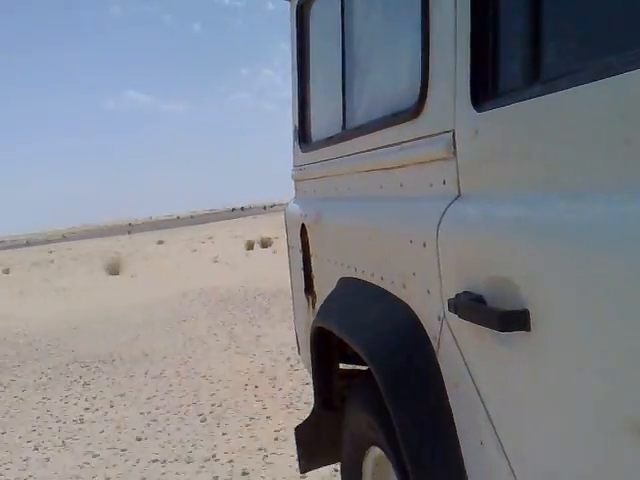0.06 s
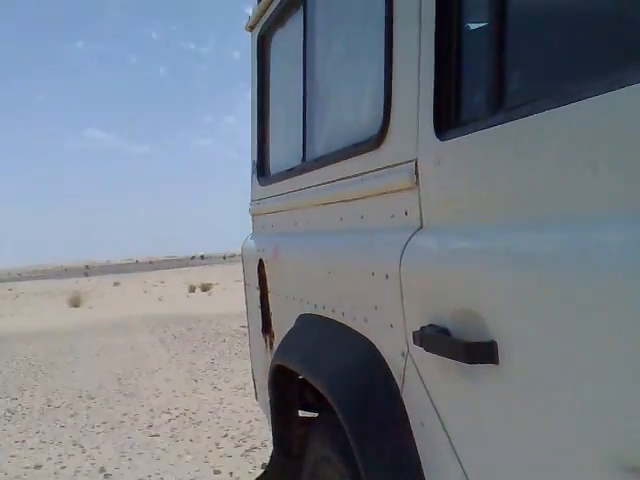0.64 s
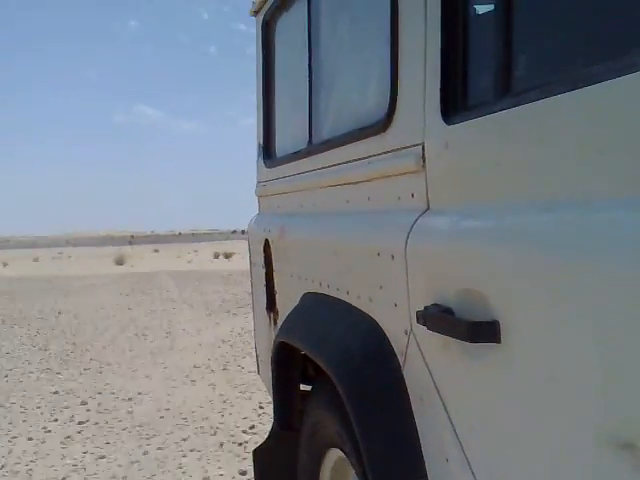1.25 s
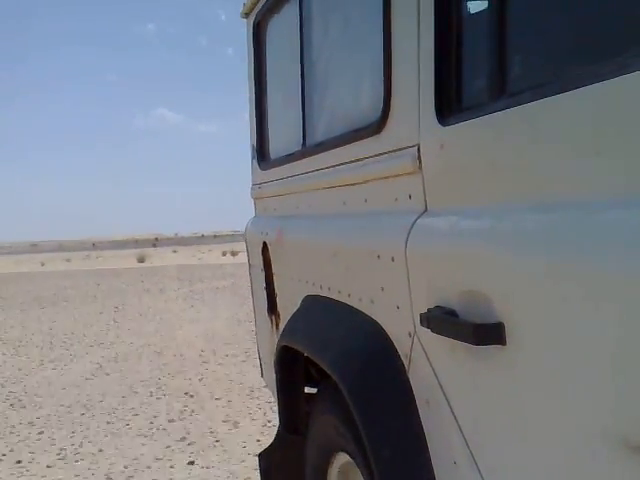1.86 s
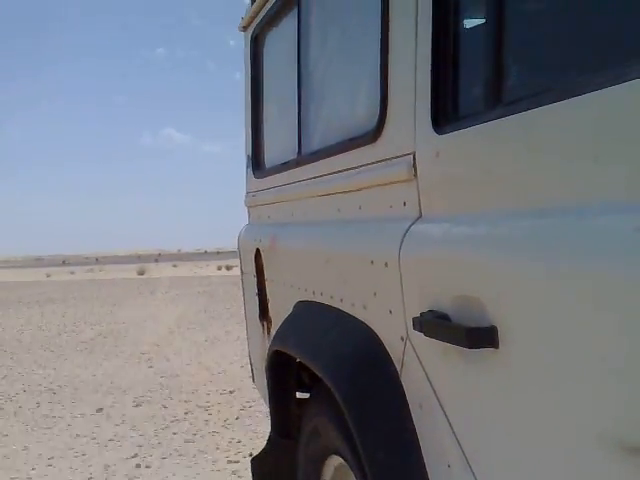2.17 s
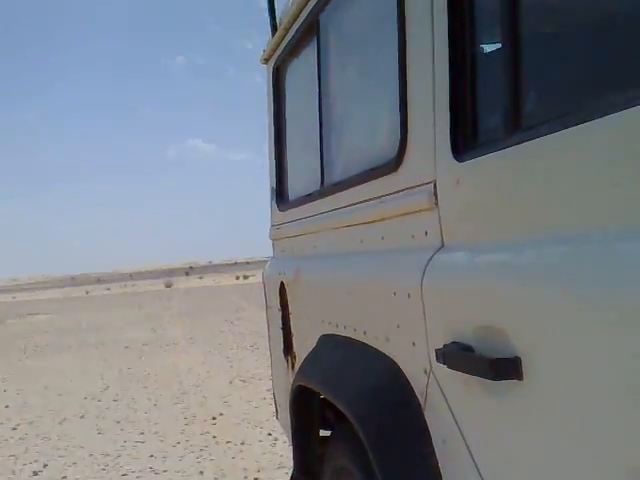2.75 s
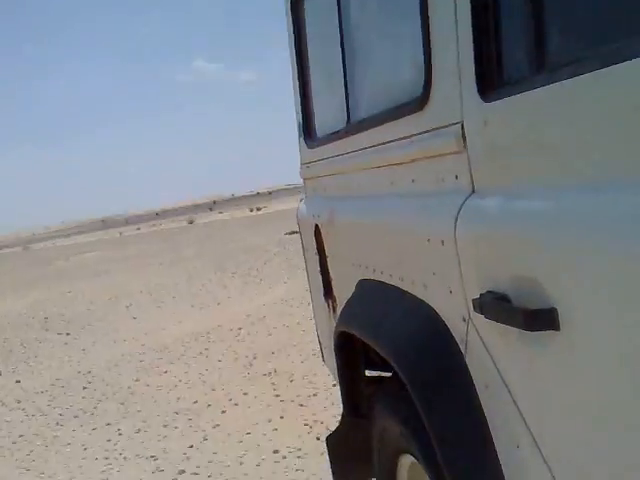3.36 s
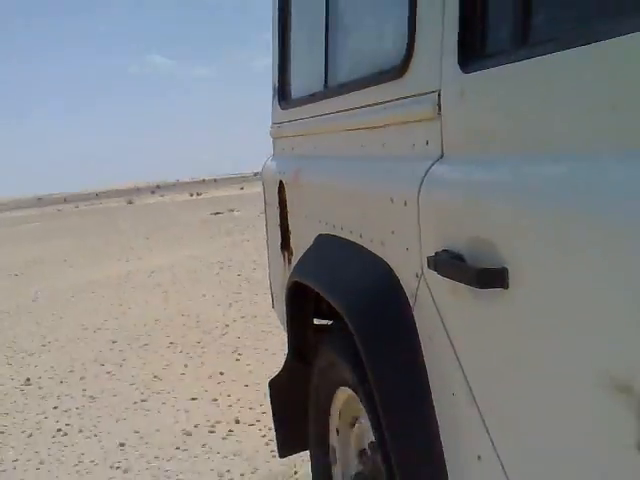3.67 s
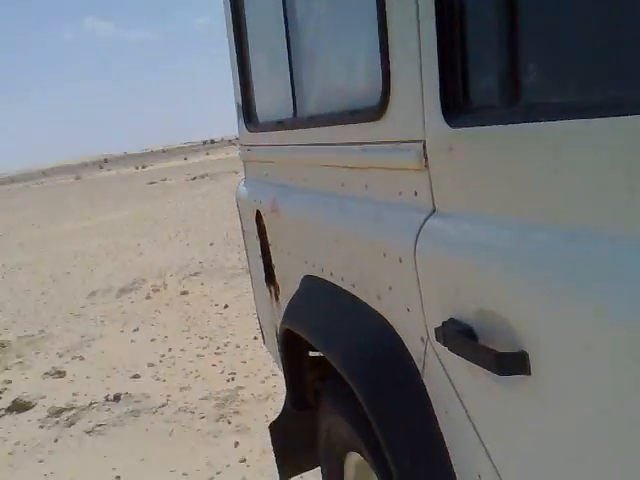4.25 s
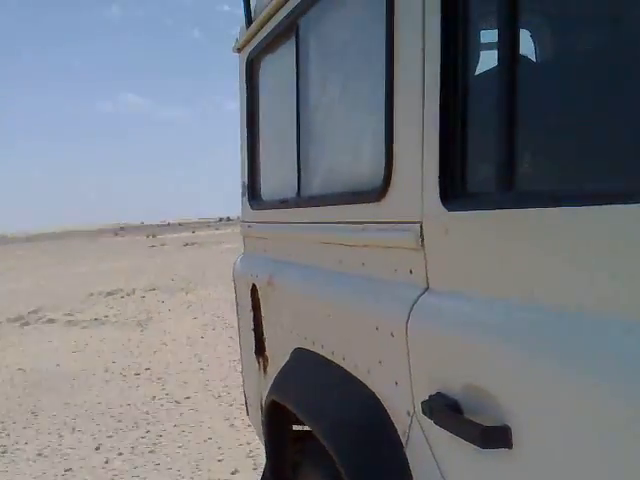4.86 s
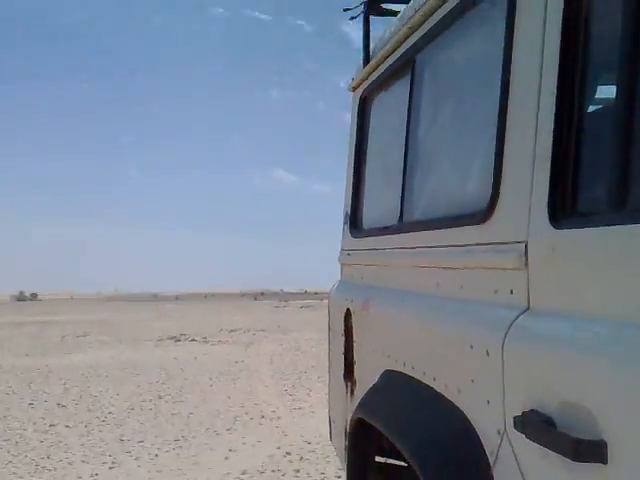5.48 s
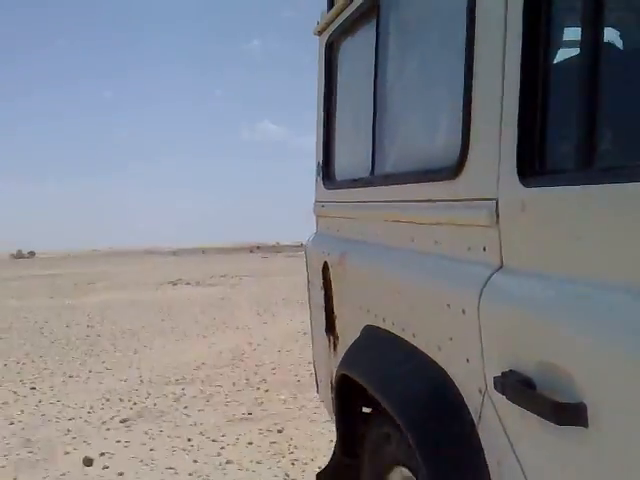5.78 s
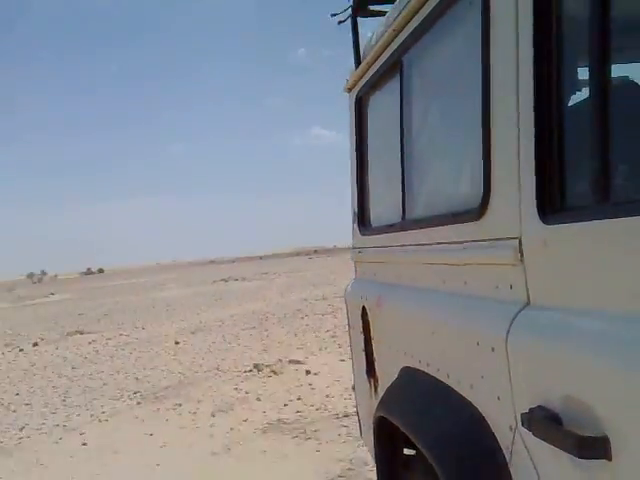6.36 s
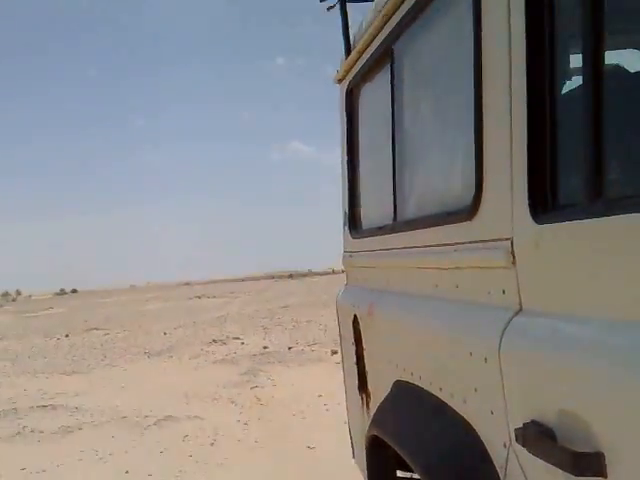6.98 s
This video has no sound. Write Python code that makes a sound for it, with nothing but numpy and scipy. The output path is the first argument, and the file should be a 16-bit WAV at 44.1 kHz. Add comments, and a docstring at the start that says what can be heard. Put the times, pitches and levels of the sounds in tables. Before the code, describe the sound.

Heavy wind buffets the microphone over tyres roaring on desert gravel, with grit spraying and an off-road vehicle's body rattling.

```python
"""Off-road drive over desert gravel

A small microphone is held out of a side window of the moving vehicle. Eddies shed by the body buffet
it and overload it; between them the tyres roar on the sand. Grit sprays into the wheel arch, stones
rattle on the body, a loose panel knocks, a fitting jingles, the springs chirp and a few sharp ticks
cut through."""
import sys
import numpy as np
from scipy import signal
from scipy.fft import rfft, irfft, next_fast_len
from scipy.io import wavfile
from scipy.ndimage import uniform_filter1d

SR = 44100
rng = np.random.default_rng(int(sys.argv[2]) if len(sys.argv) > 2 else 0)


def output_pcm(signal):
    """Save a mono or channel-first signal as 16-bit PCM at the path in sys.argv[1].

    Samples are clipped to [-1, 1] before scaling.
    """
    pcm = np.clip(np.atleast_2d(signal).T, -1, 1) * 32767
    wavfile.write(sys.argv[1], SR, np.round(pcm).astype(np.int16))


N = 313992
TIME = np.arange(N) / SR
SAND_FOLLOWS = 1.4   # dB of sand and stray grit per dB of tyre work

# spectrum of crushed gravel: frequency_hz, gain_db
CRUNCH_SPECTRUM = [(900, 1.5), (1600, 1.5), (2200, 0.5), (2700, 2.5), (3100, -5), (3500, -10.5),
                   (4100, -21.5), (5000, -24), (7000, -48.5)]
# slaps of air on the microphone port, dull thumps to sharp cracks: start_s, thump_db, crackle_db
AIR_SLAPS = [(0.034, -6.5, -54), (0.258, -6, -51), (0.46, -20, -60), (0.686, -9, -47), (0.952, -12, -60),
             (1.11, -6.5, -59), (1.184, -16.5, -62), (1.383, -12, -37), (1.666, -13, -50),
             (1.824, -6.5, -57), (2.059, -8, -42), (2.0623, -12, -26.5), (2.165, -9.5, -36),
             (2.21, -10, -30), (2.277, -12, -45), (2.442, -13.5, -43), (2.485, -16, -50), (2.542, -11, -45),
             (2.687, -11, -41), (2.843, -22, -53), (2.978, -12.5, -61), (3.02, -5, -41), (3.21, -14.5, -42),
             (3.809, -16.5, -56), (4.257, -23, -60), (4.707, -4, -53), (4.715, -11.5, -57),
             (5.085, -18, -58), (5.112, -19, -58), (5.132, -32, -66), (5.396, -10, -46),
             (5.432, -7.5, -28.5), (5.577, -12.5, -38), (5.718, -23, -53), (6.056, -16.5, -38.5),
             (6.14, -13, -48), (6.281, -17.5, -53), (6.314, -15.5, -48), (6.423, -12.5, -52),
             (6.46, -15, -58), (6.528, -11, -58), (6.62, -12.5, -59), (6.648, -13, -43), (6.736, -14, -57),
             (6.863, -23, -62), (6.922, -16.5, -41), (6.983, -13.5, -52), (6.995, -10.5, -34.5),
             (7.103, -16.5, -57)]


def from_db(db):
    """Decibels to gain."""
    return 10 ** (np.asarray(db) / 20)


def rms_one(x):
    """Scale to unit power."""
    return x / np.sqrt(np.mean(x ** 2) + 1e-20)


def colour(x, spectrum):
    """Shape x by rows of (frequency_hz, gain_db), falling 30 dB an octave past the ends; rms 1."""
    hz, db = np.transpose(spectrum)
    size = next_fast_len(N + 8192)
    log_hz = np.log2(np.maximum(np.fft.rfftfreq(size, 1 / SR), 1))
    octaves_outside = np.abs(log_hz - np.clip(log_hz, np.log2(hz[0]), np.log2(hz[-1])))
    gain = from_db(np.interp(log_hz, np.log2(hz), db) - 30 * octaves_outside)
    return rms_one(irfft(rfft(x, size) * gain, size)[:N])


def noise(spectrum):
    """Coloured noise, rms 1."""
    return colour(rng.standard_normal(N), spectrum)


def drift(rate_hz):
    """Smooth random wander, mostly slower than rate_hz; rms 1."""
    hop = 40
    pole = np.exp(-2 * np.pi * hop * rate_hz / SR)
    slow = signal.lfilter([1], [1, -2 * pole, pole * pole], rng.standard_normal(N // hop + 2002))[2000:]
    return np.interp(np.arange(N) / hop, np.arange(len(slow)), rms_one(slow))


def evened(x, span_s):
    """Hold the power of a noise steady over spans of this length."""
    width = max(int(span_s * SR), 2)
    return x / np.sqrt(uniform_filter1d(uniform_filter1d(x ** 2, width), width) + 1e-3)


def swells(rows, rise=0.48, steep=2):
    """Gain of bell curves (peak_s, length_s, level_db) added in power; rise is the share before the top."""
    power = np.zeros(N)
    for peak_s, length, db in rows:
        near = slice(*np.searchsorted(TIME, [peak_s - 4 * length, peak_s + 4 * length]))
        age = (TIME[near] - peak_s) / length
        flank = np.where(age < 0, rise, 1 - rise)
        power[near] += from_db(db) ** 2 * np.exp(-np.abs(age / flank) ** steep)
    return np.sqrt(power)


def grains(per_s, spread_db):
    """Random impacts of uneven size."""
    sizes = from_db(spread_db * np.minimum(rng.exponential(1, N), 5))
    return (rng.random(N) < per_s / SR) * sizes * rng.choice([-1, 1], N)


def filtered(x, order, hz, kind):
    """Pass x through a maximally flat filter."""
    return signal.sosfilt(signal.butter(order, hz, kind, fs=SR, output="sos"), x + 1e-18)


def ring(x, modes):
    """Sound x through resonances (pitch_hz, level_db, t60_s)."""
    ringing = 0
    for hz, db, t60 in modes:
        r = from_db(-60 / (t60 * SR))
        mode = signal.lfilter([1, 0, -1], [1, -2 * r * np.cos(2 * np.pi * hz / SR), r * r], x + 1e-18)
        ringing = ringing + from_db(db) * np.sqrt((1 - r * r) / 2) * mode
    return ringing


def ground_db():
    """How much harder than usual the tyres work the ground."""
    # tyre work along the track: time_s, level_db
    track = [(0.0, -31), (0.27, -33.5), (1.15, -34.5), (2.05, -38), (2.42, -37), (3.23, -39.5), (4.29, -37),
             (4.84, -36), (5.22, -37.5), (5.56, -42), (6.1, -41.5), (6.24, -37.5), (6.82, -41),
             (7.0, -42.5)]
    # looser gravel that the tyres dig into: peak_s, length_s, rise_db
    patches = [(0.917, 0.046, 2), (3.592, 0.046, 5.5), (4.05, 0.028, 2.5), (5.327, 0.14, 5.5),
               (5.583, 0.037, 4.5), (5.73, 0.08, 9), (5.87, .05, 5), (6.98, 0.069, 6)]
    usual_db = -36.5
    digging_db = sum(rise * swells([(s, length, 0)]) for s, length, rise in patches)
    return np.interp(TIME, *np.transpose(track)) - usual_db + digging_db


def tyres():
    """Treads roar, crush gravel and throw up fine sand; all three follow the ground and its bumps."""
    # tread roar: frequency_hz, gain_db
    roar_spectrum = [(30, -8), (70, 5.5), (110, 7.5), (170, 15.5), (240, 0.5), (330, 7), (500, 3.5),
                     (780, 5.5), (1050, -1.5), (1500, -4), (2100, -13), (3000, -26), (4000, -55)]
    # flying sand: frequency_hz, gain_db
    sand_spectrum = [(3000, -5), (4200, -5.5), (4900, -2), (5600, -7), (6600, -8.5), (8500, -17.5),
                     (11000, -21), (13500, -17), (16000, -34.5)]
    work_db = ground_db() + 1.2 * drift(rate_hz=28)
    roar = from_db(-28.5 + work_db) * noise(roar_spectrum)
    crunch = from_db(-34 + 0.95 * work_db) * colour(grains(per_s=9000, spread_db=-0.5), CRUNCH_SPECTRUM)
    sand = from_db(-60 + SAND_FOLLOWS * work_db) * colour(grains(per_s=3100, spread_db=1), sand_spectrum)
    return roar + crunch + sand


def gravel():
    """Showers of grit and pebbles rattle in the wheel arch, over a light patter that never stops."""
    # showers thrown into the arch: peak_s, length_s, level_db
    sprays = [(.025, 0.029, -40.5), (.121, .008, -51), (.42, 0.043, -61), (.73, .012, -55),
              (.86, 0.013, -56), (1.385, 0.03, -54), (1.53, .015, -64), (1.584, 0.0042, -47),
              (1.858, 0.0045, -49), (2.836, 0.0092, -51.5), (3.572, 0.014, -54), (3.61, 0.038, -52),
              (3.667, 0.013, -45), (3.7, .05, -55), (3.989, 0.014, -50), (4.07, 0.048, -50.5),
              (4.206, 0.0081, -50), (4.256, 0.022, -55.5), (4.41, 0.027, -56), (4.448, 0.033, -52),
              (4.766, .01, -59), (4.89, .014, -61), (4.935, .015, -57), (4.99, .04, -63),
              (5.09, 0.078, -55.5), (5.242, .012, -57), (5.33, 0.034, -56), (5.721, 0.0058, -44),
              (5.78, 0.023, -48.5), (5.83, 0.057, -53.5)]
    # fine grit striking the arch: frequency_hz, gain_db
    grit_spectrum = [(2000, -3.5), (3800, 7.5), (4700, 0), (5400, -1.5), (6500, -3), (8500, -6),
                     (11000, -8), (13500, -9), (15500, -16.5)]
    patter = from_db(-71 + SAND_FOLLOWS * ground_db() + 6.5 * np.clip(drift(rate_hz=32), -2, 2))
    showers = np.hypot(from_db(3.5) * swells(sprays, rise=0.58), patter)
    pebbles = from_db(10.5) * colour(grains(per_s=1400, spread_db=7.5), CRUNCH_SPECTRUM)
    grit = colour(grains(per_s=9800, spread_db=4), grit_spectrum)
    return showers * (grit + pebbles)


def stones():
    """Single stones skitter on a body panel, each in a few quick contacts."""
    # stone strikes: peak_s, level_db
    strikes = [(.265, -49), (.394, -54), (.581, -48), (.73, -45), (.86, -46), (1.009, -54), (1.525, -46.5),
               (1.707, -49), (1.858, -43.5), (2.57, -50), (2.599, -50), (2.654, -53), (3.223, -51),
               (4.258, -47), (4.409, -44), (4.447, -48), (4.545, -48), (4.63, -46), (4.866, -49),
               (5.101, -43), (5.849, -45), (5.879, -43.5), (6.271, -50), (6.688, -48), (6.943, -51)]
    # resonances of the body panel: pitch_hz, level_db, t60_s
    panel_modes = [(3750, -2, 0.009), (4820, -0.5, 0.014), (5060, -5, 0.009), (6100, -17.5, 0.0081)]
    skitter = swells([(s, 0.011, db) for s, db in strikes], rise=0.22)
    contacts = skitter * evened(grains(per_s=2100, spread_db=3), span_s=0.005)
    return from_db(-4.5) * ring(contacts, panel_modes)


def springs():
    """The springs scrape and catch in thin, rough chirps that glide as the load changes."""
    # spring chirps: peak_s, length_s, pitch_hz, glide_hz_per_s, level_db
    chirps = [(.435, .023, 15000, 9002, -58), (0.888, .018, 14400, -12000, -60),
              (0.938, 0.023, 12900, -26000, -45.5), (1.087, .025, 14700, 2002, -60),
              (2.654, .016, 13600, 0, -63), (3.633, .023, 10900, 11996, -56), (4.058, .018, 10330, -2, -57),
              (4.218, .018, 10900, 15003, -60), (4.25, 0.018, 11300, 15008, -56),
              (5.008, .023, 13900, 2, -61), (5.07, .018, 14000, 3, -62), (5.741, 0.013, 12900, -9000, -48),
              (5.78, .018, 13100, -3000, -56), (6.28, .011, 13000, -25000, -57.5),
              (6.38, .011, 12700, -10000, -56), (6.437, .011, 13100, -15000, -60),
              (7.065, .023, 12800, 4004, -52)]
    # dry scraping under each chirp: frequency_hz, gain_db
    scrape_spectrum = [(6000, -10), (9000, -4.5), (13000, -5), (15500, -5)]
    peak_s, _, hz, glide, _ = np.transpose(chirps)
    nearest = np.searchsorted((peak_s[1:] + peak_s[:-1]) / 2, TIME)
    pitch_hz = hz[nearest] + glide[nearest] * (TIME - peak_s[nearest])
    pitch_hz *= 1 + 0.03 * drift(rate_hz=900)
    envelope = swells([(s, length, db) for s, length, _, _, db in chirps])
    stick_slip = from_db(1 + 1.5 * drift(rate_hz=200))
    scrape = from_db(-9) * colour(grains(per_s=3000, spread_db=-1), scrape_spectrum)
    return envelope * stick_slip * (np.sin(2 * np.pi * np.cumsum(pitch_hz) / SR) + scrape)


def loose_fitting():
    """Each jolt makes a small metal part chatter and ring, then tremble in fits as it settles."""
    # jolts that shake the fitting: time_s, level_db
    jolts = [(2.398, -51), (2.776, -50.5), (2.89, -54), (3.11, -53), (3.16, -51.5), (3.2, -61),
             (3.245, -56), (3.358, -52), (3.415, -54), (3.534, -44), (3.57, -40), (3.606, -38),
             (3.667, -45), (3.733, -51), (3.762, -56), (3.796, -44), (3.986, -47), (4.028, -55),
             (4.09, -53), (4.26, -49), (4.445, -49)]
    # resonances of the fitting: pitch_hz, level_db, t60_s
    fitting_modes = [(5950, -3, 0.018), (5980, -5.5, 0.022), (4960, -2.5, .007)]
    jingle_s, settle_s = 0.0068, 0.086
    shaking = swells([(s + 0.002, jingle_s, db) for s, db in jolts], rise=0.28)
    settling = swells([(s + 0.01, settle_s, db - 14) for s, db in jolts], rise=0.22)
    trembling = settling * from_db(6 * (drift(rate_hz=45) - 1))
    chatter = np.hypot(shaking, trembling) * rms_one(grains(per_s=1800, spread_db=4.5))
    contacts = filtered(chatter, 2, [4300, 8000], "band")
    return from_db(-4.5) * ring(chatter, fitting_modes) + from_db(-16) * contacts


def loose_panel():
    """Hard jolts bounce a loose panel against the body in a quick run of dull contacts."""
    # panel knocks: peak_s, level_db
    knocks = [(3.569, -35), (3.607, -30), (3.665, -34), (3.987, -44), (4.052, -36), (4.206, -43),
              (4.408, -36), (4.447, -39)]
    # resonances of the loose panel: pitch_hz, level_db, t60_s
    panel_modes = [(1650, -1, 0.016), (2150, -3, 0.014), (2750, -2, 0.028), (3500, -21.5, 0.011)]
    bouncing = swells([(s, 0.012, db) for s, db in knocks], rise=0.25)
    contacts = bouncing * evened(grains(per_s=1200, spread_db=3), span_s=0.006)
    return ring(filtered(contacts, 2, 5500, "low"), panel_modes)


def ticks():
    """Single bright ticks with no ring."""
    # sharp, dry ticks: start_s, level_db
    hits = [(1.869, -33), (1.989, -28), (5.3985, -13.5), (5.949, -28.5), (6.562, -13.5)]
    start_s, level_db = np.transpose(hits)
    impulses = np.bincount((start_s * SR).astype(int), from_db(level_db), N)
    return from_db(8.5) * filtered(impulses, 1, [1500, 5000], "band")


def wake():
    """Gains of rumble and flutter in the body's wake, which sheds eddies at random."""
    # strength of the wake at the microphone: time_s, level_db
    strength = [(0.0, -26), (1.05, -26), (1.64, -20), (2.12, -14), (2.42, -17.5), (2.74, -14.5),
                (3.57, -27), (3.81, -38.5), (5.02, -29), (5.57, -16), (5.89, -16), (6.43, -13.5),
                (6.7, -12), (7.12, -15.5)]
    # the wake swings off the microphone: deepest_s, length_s, depth_db
    lulls = [(0.394, 0.087, 8), (0.53, 0.032, 11), (0.866, 0.07, 5.5), (1.0, 0.09, 5), (1.218, 0.035, 20),
             (1.63, 0.023, 15), (1.762, 0.037, 12.5), (1.96, 0.07, 14), (2.131, 0.039, 20),
             (2.397, 0.013, 22), (2.433, .008, 10), (2.604, 0.014, 14), (2.777, .018, 11.5),
             (2.885, 0.016, 11), (2.994, 0.017, 22), (3.064, 0.016, 14), (3.168, 0.03, 7),
             (3.403, 0.051, 31), (5.207, 0.029, 8), (5.329, 0.033, 20), (5.425, .014, 5), (5.487, 0.045, 9),
             (5.813, 0.021, 4), (5.983, 0.069, 22), (6.11, 0.028, 5.5), (6.3, 0.017, 0.5), (6.4, 0.03, 7),
             (6.605, 0.014, 5.5), (6.664, 0.049, 8), (6.73, 0.018, 5), (6.817, 0.057, 9), (7.018, 0.01, 8)]
    full_wake_db = -15
    wake_db = np.interp(TIME, *np.transpose(strength)) - full_wake_db
    lull_db = sum(depth * swells([(s, length, 0)]) for s, length, depth in lulls)
    eddies_db = 2.5 * drift(rate_hz=36) - lull_db
    rumble_db = -7.5 + 1.1 * wake_db + eddies_db
    flutter_db = -20.5 + 0.85 * wake_db + eddies_db + 3 * drift(rate_hz=33)
    return from_db(rumble_db), from_db(flutter_db)


def wind():
    """Eddies heave the air at the port; fine turbulence tears off where the pressure swings fastest."""
    # gusts that stand out of the wake: peak_s, length_s, rumble_db, flutter_db
    gusts = np.array([(0.04, 0.029, -6.5, -17.5), (0.145, 0.032, -6, -21), (0.254, 0.024, -5.5, -18),
                      (0.333, 0.025, -8, -19), (0.464, 0.024, -5, -25), (0.6, 0.016, -15, -30),
                      (0.649, 0.0062, -14, -35), (0.692, 0.021, -1, -12), (0.74, 0.015, -5, -17.5),
                      (0.783, 0.013, -6.5, -38), (0.938, 0.036, -6.5, -22), (1.061, 0.011, -6, -24),
                      (1.115, 0.011, 1, -18.5), (1.19, 0.026, -14, -21), (1.314, 0.023, -12.5, -19),
                      (1.388, 0.06, -5, -16.5), (1.48, 0.016, -0.5, -18), (1.563, 0.069, -9.5, -24.5),
                      (1.737, 0.039, -11, -33), (1.836, 0.047, -1.5, -17), (1.988, 0.016, -1, -12.5),
                      (2.193, 0.04, -15, -22), (2.287, 0.021, -8.5, -26), (2.425, 0.022, -5.5, -35),
                      (2.484, 0.028, -8, -33), (2.579, 0.014, -7.5, -9.5), (2.687, 0.12, -11.5, -21.5),
                      (2.828, 0.11, -14.5, -23), (2.93, 0.067, -6.5, -21), (3.105, 0.024, -11.5, -21),
                      (3.231, 0.026, -6, -20), (3.288, 0.044, -7.5, -31), (3.452, 0.056, -14, -32),
                      (3.595, 0.029, -7, -19), (3.82, 0.046, -11.5, -18.5), (3.874, 0.017, -5.5, -21),
                      (4.137, 0.065, -14.5, -28), (4.266, 0.0114, -11.5, -17), (4.57, 0.13, -17, -23.5),
                      (4.633, 0.0069, -10, -9), (4.684, 0.051, -6, -20.5), (4.96, 0.025, -19.5, -28),
                      (5.118, 0.054, -8.5, -17.5), (5.278, 0.05, -4.5, -23), (5.427, 0.073, -4, -16),
                      (5.529, 0.022, -4.5, -19), (5.714, 0.037, -9, -14), (5.754, 0.029, -7, -36),
                      (5.854, 0.011, -6.5, -16.5), (5.96, 0.037, -5.5, -47), (6.068, 0.057, -10, -22),
                      (6.254, .022, -13, -20.5), (6.462, 0.038, -3, -26), (6.5, 0.025, -6.5, -19),
                      (6.55, 0.018, -12, -17), (6.699, 0.011, -3, -32), (6.755, 0.021, -5, -12.5),
                      (6.866, 0.036, -4, -31), (7.06, 0.028, -10.5, -18.5)])
    # heaving air: frequency_hz, gain_db
    rumble_spectrum = [(12, -12), (24, -0.5), (48, 1.5), (75, -2.5), (120, -9), (180, -14), (260, -27),
                       (500, -56)]
    # tilt that makes the wake's big eddies deeper than the gusts: frequency_hz, gain_db
    wake_tilt = [(12, -4), (40, -5.5), (62, -4.5), (88, -2.5), (125, -4), (200, -7.5), (500, -5.5)]
    # fine turbulence: frequency_hz, gain_db
    flutter_spectrum = [(100, -30.5), (200, 10), (290, 7), (450, -1.5), (750, -9.5), (1300, -15.5),
                        (2200, -22.5), (3200, -36.5), (4500, -41.5), (7000, -59.5)]
    # tiny eddies popping on the port: frequency_hz, gain_db
    pop_spectrum = [(200, -5), (500, 16.5), (1100, -1.5), (1800, -19.5), (3000, -23.5), (4500, -48.5)]
    # deep, steady slipstream: frequency_hz, gain_db
    slipstream_spectrum = [(12, -4), (22, -3), (36, 2.5), (55, -3), (110, -27.5), (220, -32), (400, -22.5)]
    wake_rumble, wake_flutter = wake()
    heave = evened(noise(rumble_spectrum), span_s=0.045)
    deep_heave = evened(colour(heave, wake_tilt), span_s=0.12)
    # a gust takes over from the wake while it lasts
    gust_rumble = from_db(2) * swells(gusts[:, [0, 1, 2]], rise=0.4, steep=2.42)
    rumble = gust_rumble ** 2 * heave + wake_rumble ** 2 * deep_heave
    rumble /= np.hypot(gust_rumble, wake_rumble)

    tearing = np.hypot(0.5, rms_one(np.gradient(heave))) * from_db(1.8 * drift(rate_hz=66))
    flutter = evened(noise(flutter_spectrum) * tearing, span_s=0.026)
    pops = from_db(-10) * colour(grains(per_s=59, spread_db=1), pop_spectrum)
    gust_flutter = from_db(2.5) * swells(gusts[:, [0, 1, 3]], rise=0.4, steep=3.2)
    turbulence = np.sqrt(gust_flutter ** 2 + wake_flutter ** 2 + from_db(-39.5) ** 2)
    slipstream = from_db(-25.5) * evened(noise(slipstream_spectrum), span_s=0.051)
    # the flow runs smooth just before a slap
    calm_s, calm_db = 0.011, -6.5
    calm = swells([(s - calm_s / 2, calm_s, 0) for s, _, _ in AIR_SLAPS], rise=0.54, steep=3.8)
    return rumble + from_db(calm_db * calm) * turbulence * (flutter + pops) + slipstream


def rips(air):
    """Air tears along the edge of the port: the buffeting eases and breaks into tiny pressure snaps."""
    # ragged bursts of tearing: peak_s, length_s, level_db
    bursts = [(0.26, .012, -26), (0.47, .012, -37), (1.383, 0.016, -16.5), (1.487, 0.024, -26),
              (1.81, 0.014, -25), (1.843, 0.0084, -17), (2.32, 0.023, -23.5), (2.375, 0.011, -27.5),
              (2.462, 0.012, -24.5), (2.502, 0.032, -30), (2.574, 0.026, -29), (2.73, 0.031, -23.5),
              (2.913, 0.035, -26), (4.648, 0.036, -34), (5.288, 0.009, -23.5), (5.54, 0.0086, -22.5),
              (5.586, 0.02, -19), (5.649, 0.018, -27.5), (5.711, 0.037, -24), (5.873, 0.068, -33.5),
              (6.07, 0.015, -29), (6.14, 0.013, -23), (6.168, 0.02, -30), (6.219, 0.038, -26.5),
              (6.281, .012, -26), (6.346, 0.026, -27.5), (6.435, 0.01, -28), (6.475, 0.0093, -22),
              (6.533, 0.012, -26), (6.569, 0.016, -20.5), (6.635, 0.011, -25), (6.76, 0.016, -26),
              (6.829, 0.0074, -30), (7.041, 0.0076, -28), (7.068, 0.013, -22), (7.09, 0.015, -23)]
    # pressure snaps: frequency_hz, gain_db
    snap_spectrum = [(350, 0.5), (800, 11), (1500, 3.5), (2400, -7), (3300, -14.5), (4300, -26.5),
                     (5600, -31), (7500, -52), (10000, -57)]
    snaps = evened(colour(grains(per_s=1100, spread_db=2), snap_spectrum), span_s=0.003)
    torn = np.minimum(swells([(s, length, 0) for s, length, _ in bursts], rise=0.35, steep=3.8), 1)
    return (1 - 0.24 * torn) * air + from_db(2) * swells(bursts, rise=0.39, steep=2.6) * snaps


def slaps(air):
    """The flow breaks off the port: the gust lets go, the pressure flips and a short crackle follows."""
    slap_s, crackle_s, flip_s, flip_lag_s = 0.0044, 0.0038, 0.0012, 0.0015
    flips = np.zeros(N)
    for s, db, _ in AIR_SLAPS:
        near = slice(*np.searchsorted(TIME, [s - slap_s, s + 2 * slap_s]))
        age = (TIME[near] - s - flip_lag_s) / flip_s
        flips[near] += from_db(db + 12.5) * rng.choice([-1, 1]) * age * np.exp(-age ** 2)
    letting_go = swells([(s + 0.0019, slap_s, 0) for s, _, _ in AIR_SLAPS], rise=0.81)
    thump_gain = swells([(s + 0.0005, slap_s, db + 2) for s, db, _ in AIR_SLAPS], rise=0.15)
    crackle_gain = swells([(s + 0.0005, crackle_s, db + 12.5) for s, _, db in AIR_SLAPS], rise=0.12)
    # dull body of a slap: frequency_hz, gain_db
    thump_spectrum = [(150, 7.5), (350, 5.5), (900, -4), (1600, -16), (2600, -32), (4000, -48.5)]
    # its sharp edge: frequency_hz, gain_db
    crackle_spectrum = [(900, 4), (1800, 14), (3200, -3.5), (4200, -9.5), (6500, -28), (10000, -37)]
    thump = thump_gain * evened(noise(thump_spectrum), span_s=0.0044)
    crackle = crackle_gain * evened(noise(crackle_spectrum), span_s=0.0022)
    pressure = np.clip(1 - 0.79 * letting_go, 0, 1) * air + flips + thump
    venting = np.hypot(1, crackle_gain / from_db(-18))   # a loud crackle vents the pressure on the port
    return pressure / venting + crackle


def limiter(x):
    """Gain that ducks under loud peaks and climbs back at a steady rate."""
    threshold_db, slope, attack_s, release_db_per_s = -4.5, 0.4, 0.037, 73.5
    duck_db = slope * np.maximum(20 * np.log10(np.abs(x) + 1e-9) - threshold_db, 0)
    climb_db = release_db_per_s * TIME
    held_db = np.maximum.accumulate(duck_db + climb_db, axis=-1) - climb_db
    pole = np.exp(-1 / (attack_s * SR))
    return from_db(-signal.lfilter([1 - pole], [1, -pole], held_db))


def scene():
    """Wind right on the microphone, over the tyres and the rattling vehicle; mono."""
    air = slaps(rips(wind()))
    return (air + tyres() + gravel() + stones() + loose_panel() + loose_fitting() + springs())[None]


def record(dry):
    """Strong gusts duck the gain and saturate the microphone; ticks cut through; the top is cut."""
    ceiling = 0.73
    squeezed = ceiling * np.tanh(dry * limiter(dry) / ceiling)
    top_cut = signal.cheby2(14, 60, 16400, fs=SR, output="sos")
    return signal.sosfilt(top_cut, squeezed + ticks())


dry = scene()
out = record(dry)
output_pcm(out)
```